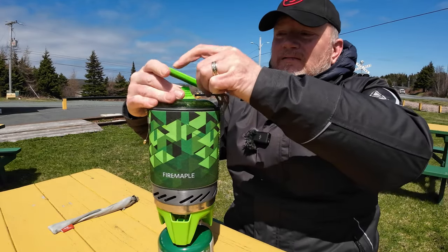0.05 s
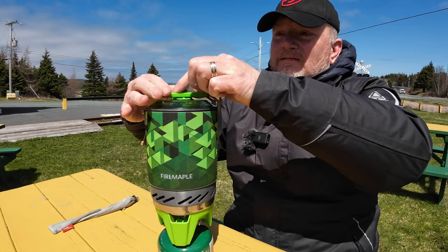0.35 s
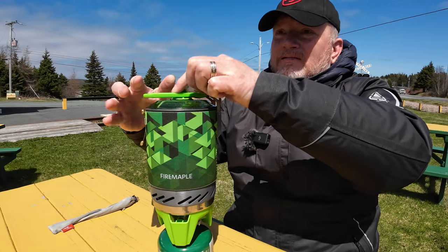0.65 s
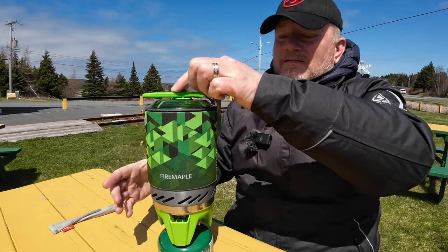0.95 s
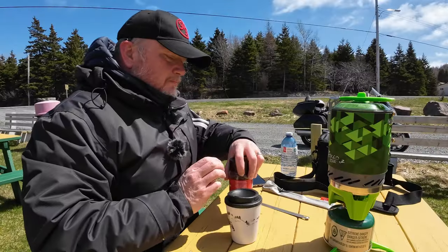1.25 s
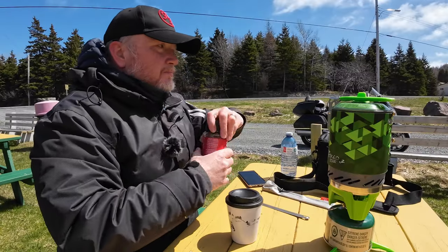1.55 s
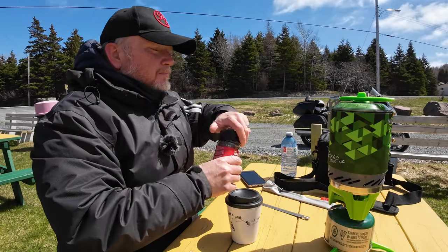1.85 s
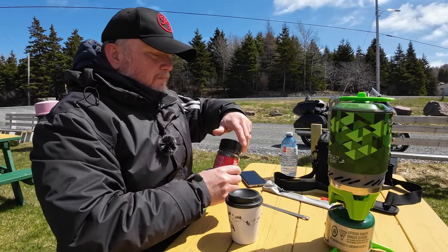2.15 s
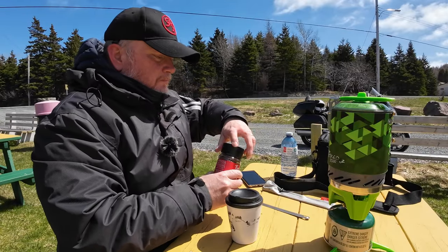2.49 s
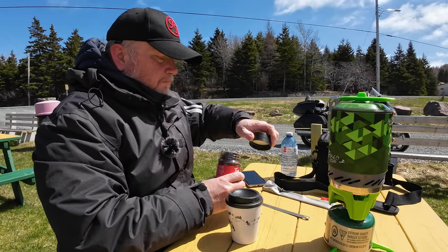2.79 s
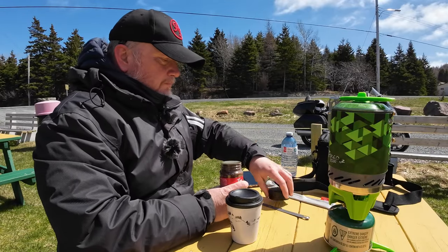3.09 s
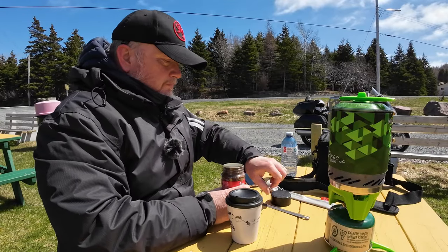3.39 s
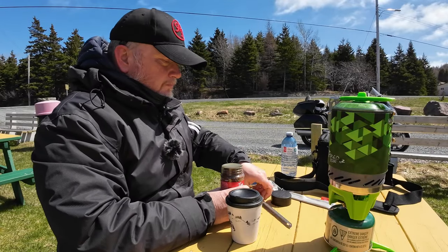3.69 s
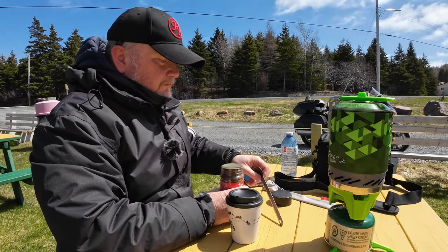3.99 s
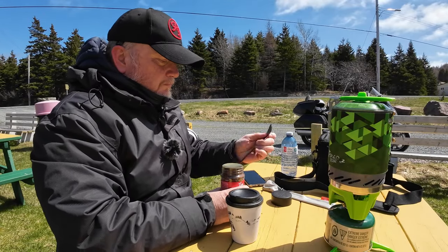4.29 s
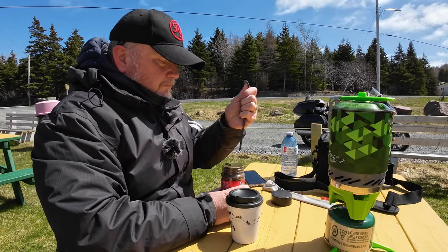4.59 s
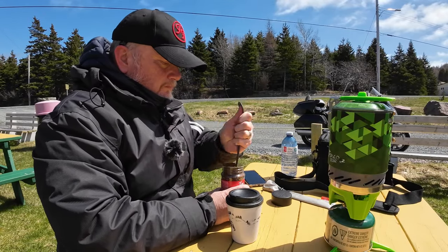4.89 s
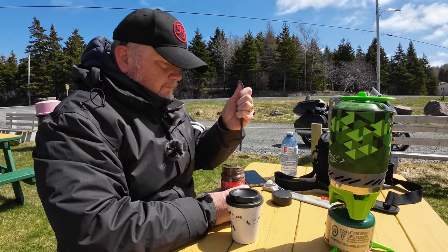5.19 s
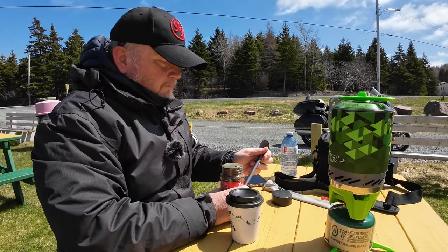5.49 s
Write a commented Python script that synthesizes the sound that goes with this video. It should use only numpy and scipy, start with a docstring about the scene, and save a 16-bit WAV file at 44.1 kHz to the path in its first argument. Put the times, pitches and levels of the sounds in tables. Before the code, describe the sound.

A gas camp stove hisses and roars under a pot throughout, outdoors, heard by one close microphone and louder on the left. At about 0.2 to 0.3 seconds the lid is pressed on with a few light ticks and knocks. Near 1.1 seconds the burner dips for an instant and continues a little softer, with a changed tone. A low, soft putter starts there and fades after 3.2 seconds. Nylon sleeves swish faintly from about 1 to 2.7 seconds. Between 1.9 and 2.7 seconds a jar is unscrewed with a short scrape, clicks and small knocks. Its cap knocks on the table at 3.3 seconds. A steel spoon is lifted with a knock and faint rattle at 3.8, followed by a light tap and tiny scrapes. Around 5 seconds it strikes the jar and crunches briefly into granules, then clinks brightly on the jar at 5.4 seconds.

```python
"""A gas camp stove hisses and roars under a pot, on a picnic table outdoors. One close microphone, louder
on the left, hears it from the front, then from the side. The flame rings the space under the pot; the
gas jet hisses above it. The lid is pressed on, a jar is unscrewed and its cap put down, and a steel
spoon is picked up, dug into granules and clinked on the jar: knocks ring each object, and friction
scrapes and squeals. Nylon sleeves swish, and a low putter comes and goes."""
import sys
import numpy as np
from scipy import signal
from scipy.fft import rfft, irfft
from scipy.io import wavfile
from scipy.ndimage import uniform_filter1d, map_coordinates

SR = 44100
rng = np.random.default_rng(int(sys.argv[2]) if len(sys.argv) > 2 else 0)


def to_wav(sig):
    """Store sig (one row per channel, or 1-D mono) as 16-bit WAV at the path in sys.argv[1].

    Samples outside -1..1 are clipped; the rate is SR.
    """
    pcm = np.clip(np.atleast_2d(sig), -1, 1) * 32767
    pcm = np.round(pcm).astype(np.int16)
    wavfile.write(sys.argv[1], SR, pcm.T)  # frames by channels


N = 249165
TIME = np.arange(N) / SR
SIDE_FROM_S = 1.092  # from here on the microphone is at the side of the stove
DIG_S, DIG_LENGTH_S = 5.009, 0.072  # the spoon goes into the granules
TOP_HZ = 15700


def undb(db):
    """Decibels to gain."""
    return 10 ** (np.asarray(db) / 20)


def unit(x):
    """Scale to rms 1."""
    return x / np.sqrt(np.mean(x ** 2))


def curve(table):
    """Join (time, value) points into a line through the scene."""
    return np.interp(TIME, *np.transpose(table))


def bell(x, centre, width):
    """Gaussian bump of height 1."""
    return np.exp(-((x - centre) / width) ** 2)


def colour(x, spectrum, peaks=()):
    """Filter by a smooth spectrum with peaks and hollows on it; rms 1."""
    f = np.fft.rfftfreq(len(x), 1 / SR)
    hz, db = np.transpose(spectrum)
    gain_db = np.interp(np.log(f + 1), np.log(hz), db)
    for centre, width, height in peaks:
        gain_db += height * bell(f, centre, width)
    return unit(irfft(rfft(x) * undb(gain_db), len(x)))


def passband(x, hz, kind="band", order=2, zero_phase=False):
    """Butterworth filter, run both ways for zero phase."""
    run = signal.sosfiltfilt if zero_phase else signal.sosfilt
    return run(signal.butter(order, hz, kind, fs=SR, output="sos"), x)


def walk(rate):
    """Random levels held 1 / rate s and smoothed twice; rms 1."""
    k = int(SR / rate)
    held = np.repeat(rng.standard_normal(N // k + 1), k)
    return unit(uniform_filter1d(uniform_filter1d(held, k), k)[:N])


def grains(count, spread_db):
    """Friction: dense tiny slips of very unequal size."""
    return rng.standard_normal(count) * undb(spread_db * rng.standard_normal(count))


def add(track, s, sound):
    """Mix a sound in at time s."""
    i = int(s * SR)
    track[i:i + len(sound)] += sound[:N - i]


def echo(x, lag_s, sway_s, share):
    """Add a reflection; a swaying path makes its comb of peaks drift. The level stays."""
    lag = (lag_s + sway_s * walk(2.436)) * SR
    reflection = map_coordinates(x, [np.arange(N) - lag], order=3)
    return x.std() * unit(x + share * reflection)


def drift(x, shift, waver_octaves):
    """Slide all resonances slowly up and down together, with a quicker waver on top."""
    speed = 2 ** (curve(shift) + waver_octaves * walk(9))
    return map_coordinates(x, [np.cumsum(speed)], order=3, mode="mirror")


def blows(hits, modes, chatter_s, damping=1):
    """Each blow rings the modes while the surfaces chatter briefly; damping divides the ring time."""
    out, t = np.zeros(N), TIME[:SR // 4]
    hz, db, t60 = np.transpose(modes)[:, :, None]
    # the body radiates little outside the range of its modes
    radiated_hz = [.8 * hz.min(), min(1.4 * hz.max(), TOP_HZ)]
    for s, level_db, tilt_db, chatter in hits:
        polarity = rng.choice([-1, 1], hz.shape)  # set by the spot that is struck
        mode_db = db + tilt_db * np.log2(hz) - 60 * damping * t / t60  # harder contact tilts upward
        ring = np.sum(polarity * undb(mode_db) * np.sin(2 * np.pi * hz * t), axis=0)
        contact = chatter * rng.standard_normal(len(t)) * np.exp(-t / chatter_s)
        blow = passband(ring / np.abs(ring).max() + contact, radiated_hz, order=3)
        add(out, s, undb(level_db) * blow / blow[t < .003].std())  # the first 3 ms set the level
    return out


def sleeves(flutter_db=2):
    """Nylon rubs on nylon; each swish is heard only from the microphone position at its middle."""
    # arm movements (middle [s], half width [s], level [dB])
    swishes = [(1.02, 0.26, -44), (1.54, 0.22, -49), (1.92, 0.11, -51.5), (2.218, .028, -49),
               (2.44, 0.06, -54), (2.71, 0.05, -55)]
    # spectrum of rubbed nylon (frequency [Hz], level [dB])
    nylon = [(30, -40), (300, 6), (1500, 13.5), (4000, -1), (8000, 0), (12000, -5), (16000, -8)]
    motion = np.zeros(N)
    for s, width, db in swishes:
        same_position = (TIME < SIDE_FROM_S) == (s < SIDE_FROM_S)
        motion += same_position * undb(db) * bell(TIME, s, width)
    return colour(grains(N, spread_db=3), nylon) * motion * undb(flutter_db * walk(59.94))


def putter_pulses(from_s=1.1375, pair_s=.0093, jitter_s=.00073, scatter_db=.8):
    """Slightly uneven pairs of impulses, about thirteen a second: the firsts and the seconds."""
    # pace of the putter (time [s], rate [pairs/s])
    pace = [(1.14, 13.65), (2.2, 13.15), (3.2, 12.9), (3.8, 12.6)]
    turns = np.cumsum(curve(pace) * (TIME >= from_s)) / SR
    starts = TIME[np.flatnonzero(np.diff(np.ceil(turns)))]
    first, second = np.zeros((2, N))
    for s, (size1, size2, late) in zip(starts[:-1], rng.standard_normal((len(starts), 3))):
        add(first, s, undb([scatter_db * size1]))
        add(second, s + pair_s + jitter_s * late, undb([scatter_db * size2]))
    return first, second


def putter(from_s=1.1375, fades_s=3.22, level_db=-31.7, fade_db_per_s=35, hum_hz=111, chirp_hz=5330):
    """Paired soft pressure dips keep a low hum going; each pair rasps, ticks and chirps faintly."""
    # spectrum of the tick (frequency [Hz], level [dB])
    tick_spectrum = [(4500, -6), (5250, -10), (5800, -6), (7900, 1), (9300, -34), (10800, -6), (15000, -41)]
    first, second = putter_pulses(from_s)
    dip = signal.windows.gaussian(SR // 20, .00089 * SR)
    dips = -signal.fftconvolve(first + second, dip, "same")
    throb = passband(dips, 46, "high", order=4, zero_phase=True)
    # hum and tick grow against the throb as it runs
    hum_db = -19.5 + 2.8 * (TIME - from_s)
    tick_db = -21.5 + 3.2 * (TIME - from_s)
    hum = undb(hum_db) * unit(signal.lfilter(*signal.iirpeak(hum_hz, Q=12, fs=SR), dips))
    overtone = undb(-23.5) * unit(signal.lfilter(*signal.iirpeak(210, Q=6, fs=SR), dips))
    rasp_gate = signal.fftconvolve(first + second, signal.windows.hann(SR // 40), "same")
    rasp = undb(-22) * rasp_gate * unit(passband(rng.standard_normal(N), [160, 270]))
    # the tick trails each dip and is stronger on the second of the pair
    tick_gate = np.roll(signal.fftconvolve(.5 * first + second, dip, "same"), int(.0035 * SR))
    ticks = tick_gate * colour(rng.standard_normal(N), tick_spectrum)
    # a thin, wavering chirp rides on the second dip
    whistle = np.sin(2 * np.pi * np.cumsum(chirp_hz + 140 * walk(90)) / SR)
    chirp_gate = signal.fftconvolve(second, signal.windows.hann(SR // 36), "same")
    chirps = whistle * chirp_gate * undb(-13 + 2.5 * walk(16))
    envelope = undb(level_db - fade_db_per_s * np.maximum(TIME - fades_s, 0))
    return envelope * (throb + hum + overtone + rasp + undb(tick_db) * (ticks + chirps))


def pot_lid():
    """The lid knocks as it is pressed on, and the rim of the pot ticks."""
    # modes of the rim and the lid (frequency [Hz], level [dB], t60 [s])
    rim = [(2850, -6.5, 0.015), (5430, 8.5, 0.029), (5900, 2, .014), (7250, -7, 0.013), (8170, 4, .014),
           (10200, -1, 0.012), (10800, -2, .012), (11700, 3, .012), (12500, 0, .012), (13500, -7, .012),
           (14600, -13, .012)]
    lid = [(219, -9, 0.057), (384, -9, 0.049), (687, 5, 0.015), (1040, 8.5, 0.0067), (1500, -7, 0.0092),
           (2250, 12, 0.0082), (5500, 1, 0.0057), (6170, 1, 0.0066)]
    # blows on each (time [s], level [dB], tilt [dB/octave], chatter [0-1])
    ticks = [(.2122, -27, -3, 0.08), (.2138, -24, -5.5, 0.12)]
    presses = [(.2, -29.5, -9.5, 0), (.3003, -24, -7, 0.1), (.304, -29.5, -8, 0.2),
               (.3085, -29.5, -1, 0.12), (.311, -29, 0, 0.15)]
    return blows(ticks, rim, chatter_s=.0019) + blows(presses, lid, chatter_s=.0055)


def jar():
    """The cap clicks as it is unscrewed, and knocks ring the body of the jar."""
    # modes of the cap and the body (frequency [Hz], level [dB], t60 [s])
    cap = [(805, 8, 0.0029), (1700, -10, 0.004), (2670, 2.5, 0.01), (2960, -2.5, 0.013), (5187, -13, 0.007),
           (6360, -11, 0.013), (7570, -7.5, 0.0074), (10900, -18.5, 0.0049)]
    body = [(1480, 5.5, 0.008), (2420, 7.5, 0.011), (2900, -5, 0.0097), (3500, -2, 0.022),
            (4900, -10, .012), (6300, -9, 0.022), (7200, 1, .016), (8070, -5, 0.024), (11390, -3, .018),
            (12350, -15, .016)]
    # blows on each (time [s], level [dB], tilt [dB/octave], chatter [0-1])
    clicks = [(1.8993, -26, -22, 0), (1.8995, -33, 22, 0), (2.443, -24.5, -1, 0.02), (2.4475, -38, 9, 0),
              (2.48, -45, 3, 0.2), (2.637, -47, 8, 0.1), (2.711, -47.5, 14, 0.4)]
    knocks = [(2.0185, -32.5, -13, .03), (2.229, -29.5, -2, .12)]
    return blows(clicks, cap, chatter_s=.0021) + blows(knocks, body, chatter_s=.0014)


def picnic_table():
    """The table top rings briefly as the cap is put down and things are handled on it."""
    # modes of the top (frequency [Hz], level [dB], t60 [s])
    top = [(850, -10, 0.016), (1040, 0, 0.014), (1680, -17, 0.011)]
    # blows on it (time [s], level [dB], tilt [dB/octave], chatter [0-1])
    knocks = [(3.2618, -24.5, 0, 0), (3.297, -35.5, 45, 0), (3.318, -34.5, 22, .1),
              (3.7935, -28.5, -21, 0.01), (5.011, -30.5, -1, 0)]
    return blows(knocks, top, chatter_s=.0026)


def spoon_lift(middle_s=3.801, count=7, gap_s=.015, jitter_s=.0017, peak_db=-44.5, fall_db_per_s=330):
    """The steel spoon leaves the table in uneven taps, loudest in the middle; a damped tap follows."""
    # modes of the spoon (frequency [Hz], level [dB], free t60 [s])
    steel = [(4116, -8, 0.066), (4350, -12, 0.071), (5286, -11, 0.073), (5750, -1, .08), (6756, -4, 0.075),
             (7510, 4, 0.093), (8200, -10, 0.086), (8769, -3, .06), (9800, -1, .04), (10800, 0, 0.072),
             (12390, -2, 0.049), (13750, -9, 0.037)]
    # the later tap (time [s], level [dB], tilt [dB/octave], chatter [0-1])
    tap = [(4.311, -37.5, 0.0042, 0.56)]
    offsets = gap_s * (np.arange(count) - (count - 1) / 2) + jitter_s * rng.standard_normal(count)
    rattle = [(middle_s + dt, peak_db - fall_db_per_s * abs(dt), 0, .076) for dt in offsets]
    return blows(rattle, steel, chatter_s=.0016) + blows(tap, steel, chatter_s=.0018, damping=4.9)


def spoon_on_jar(clink_s=5.443, clink_db=-13, bounce_s=.0068, bounce_db=-9, touch_s=.0013, touch_db=-3):
    """The spoon strikes the jar going in; later it clinks and bounces, each contact touching twice."""
    # modes of spoon and jar together (frequency [Hz], level [dB], free t60 [s])
    modes = [(2090, -1.5, 0.028), (2890, 4, 0.019), (3350, -19, 0.1), (4064, 0, 0.024), (4330, 0, .008),
             (4590, 3.5, 0.018), (4850, 1, .012), (5254, -1, 0.027), (6117, 3, .023), (6500, -1, .014),
             (6985, -3, .018), (7495, -1, .028), (7864, 1, .02), (8830, 3, 0.019), (9050, 5, 0.019),
             (9720, 5, 0.016), (10075, 5, .016), (10200, 5, 0.02), (10830, 6, 0.021), (11550, -1, .015),
             (12450, -1, .017), (14200, -2, .016), (14950, 3, 0.017)]
    # blows on the way in (time [s], level [dB], tilt [dB/octave], chatter [0-1])
    strikes = [(4.9528, -18.3, 0, .4), (4.9583, -26.5, 4, .3), (4.9653, -27.5, 6, .35), (4.972, -33, 0, .3)]
    contacts = [(clink_s, clink_db), (clink_s + bounce_s, clink_db + bounce_db)]
    clink = [(s + k * touch_s, db + k * touch_db, -1, .13) for s, db in contacts for k in range(2)]
    going_in = blows(strikes, modes, chatter_s=.0025, damping=2.4)
    return going_in + blows(clink, modes, chatter_s=.0021, damping=1.1)


def scrape(length_s, start_db, end_db, peaks):
    """One stroke of uneven slips through the given resonances."""
    # spectrum of gritty friction (frequency [Hz], level [dB])
    grit = [(30, -45), (75, -11), (160, 12.5), (700, 5), (1300, 8.5), (2200, 1), (3500, 5), (4300, -14),
            (5600, -2), (9000, 0.5), (11500, -12), (15500, -11)]
    slips = colour(grains(SR // 8, spread_db=4), grit, peaks)[:int(length_s * SR)]
    contact = signal.windows.tukey(len(slips), .2)
    return slips * contact * undb(np.linspace(start_db, end_db, len(slips)))


def friction(width_ratio=.27, overtone_ratio=1.75, judder_db=1.3):
    """The cap turns on its thread and the spoon slides over the rim into the granules, juddering."""
    # strokes (time [s], length [s], start level [dB], fade [dB], squeal [Hz], squeal height [dB])
    slides = [(1.89, 0.1, -45.5, 10, 8100, 18), (4.426, 0.064, -53, 10, 9300, 16),
              (4.57, 0.053, -54.5, 1, 9330, 17), (4.9512, 0.00425, -25.5, -14, 7350, 19),
              (4.954, 0.049, -25, 19, 7560, 15.5)]
    # resonances while digging (frequency [Hz], width [Hz], height [dB])
    granules = [(850, 650, 5.5), (2800, 500, 2), (5400, 414, 2)]
    out = np.zeros(N)
    for s, length, db, fade_db, hz, squeal_db in slides:
        squeal = [(ratio * hz, width_ratio * hz, squeal_db) for ratio in (1, overtone_ratio)]
        add(out, s, scrape(length, db, db - fade_db, squeal))
    add(out, DIG_S, scrape(DIG_LENGTH_S, start_db=-36.5, end_db=-34.5, peaks=granules))
    return out * undb(judder_db * walk(300))


def crunch(count=9, start_db=-45, rise_db=7, scatter_db=4, jitter_s=.0018):
    """Granules snap against the jar wall at uneven moments, harder as the spoon goes in."""
    # modes of the wall (frequency [Hz], level [dB], t60 [s])
    wall = [(2680, -3, .014), (3490, 0, .022), (5330, 0, .02), (7100, -1, .012), (7950, 0, .012)]
    depth = np.arange(1, count + 1) / (count + 1)
    late, size = rng.standard_normal((count, 2)).T
    times = DIG_S + DIG_LENGTH_S * depth + jitter_s * late
    levels = start_db + rise_db * depth + scatter_db * size
    snaps = [(s, db, 0, .38) for s, db in zip(times, levels)]
    return blows(snaps, wall, chatter_s=.001)


def flame(gas, jet, ring_hz=(1070, 1340), boom_hz=(290, 360), flutter_db=.95):
    """The turbulent flame, the gas noise below the jet's hiss, rings the cup under the pot."""
    # strength of the cup's ring and of its low boom (time [s], gain [dB])
    ring_db = [(1.15, 3), (1.85, -7.5), (2.3, -3), (4.7, -0.5), (5.05, 4.5), (5.65, 3.6)]
    boom_db = [(1, 3.5), (1.2, -3), (2, -1.5), (2.5, 0)]
    # drift of the roar's resonances (time [s], shift [octaves])
    shift = [(.2, 0.00069), (1, 0), (1.249, -0.048), (1.9, -0.04), (2.802, -.015), (3.501, 0.01), (4.4, 0),
             (5.1, -0.0054), (5.65, 0.0093)]
    # brief swells and sags of the roar (time [s], half width [s], change [dB])
    surges = [(0.43, 0.0074, -11.5), (.8, 0.032, 2.5), (1.27, 0.19, 0.85), (2.57, 0.067, -2.5),
              (3.15, 0.054, 1.2), (3.57, 0.13, -3)]
    ring = (undb(curve(ring_db)) - 1) * passband(gas, ring_hz, zero_phase=True)
    boom = (undb(curve(boom_db)) - 1) * passband(gas, boom_hz, zero_phase=True)
    roar = drift(gas - jet + ring + boom, shift, waver_octaves=.004)
    roar = echo(roar, lag_s=.0042, sway_s=.0002, share=.14)
    surge_db = sum(db * bell(TIME, s, width) for s, width, db in surges)
    return roar * undb(surge_db + flutter_db * walk(35))


def burner(spectrum, cup, hiss_shift, roar_db, hiss_db, jacket_s, jacket_share, split_hz=3800):
    """The flame roars; above it the gas jet hisses and glances off the chest of the jacket."""
    gas = colour(rng.standard_normal(N), spectrum, cup)
    jet = passband(gas, split_hz, "high", order=4, zero_phase=True)
    roar = undb(roar_db) * flame(gas, jet)
    hiss = echo(jet, lag_s=jacket_s, sway_s=0, share=jacket_share)
    hiss = drift(hiss, hiss_shift, waver_octaves=.018)
    hiss = echo(hiss, lag_s=.0009, sway_s=.00007, share=.17)
    return roar + hiss * undb(hiss_db + .7 * walk(10) + .3 * walk(3))  # flutter and slow swell


def stove(gap_s=.0099):
    """The burner close up, louder from the front; the level dips briefly as the side takes over."""
    # spectrum of roar and hiss at each microphone position (frequency [Hz], level [dB])
    front_spectrum = [(30, -26.5), (85, -7.5), (170, -3.5), (320, 0.5), (520, -6), (1000, -6), (1600, -4.5),
                      (2200, -12), (2900, -13), (3600, -26.5), (4500, -36), (6200, -22.5), (7600, -30),
                      (10000, -29.5), (15500, -37)]
    side_spectrum = [(30, -37), (80, -9.5), (160, -3), (280, -3), (500, -6), (750, -2), (1650, 0),
                     (2400, -11), (3500, -24), (4600, -36.5), (6700, -21), (8800, -35.5), (10500, -38),
                     (15500, -38)]
    # peaks and hollows of burner cup and pot (frequency [Hz], width [Hz], height [dB])
    front_cup = [(887, 153, 5.5), (1058, 49, 5.5), (1905, 73, -9), (2870, 170, 7), (4940, 710, 2),
                 (5960, 320, 7), (6860, 450, 4.5), (8750, 450, 9.5)]
    side_cup = [(338, 37, 9), (498, 47, -4), (984, 65, -12.5), (1167, 78, 2), (1412, 91, -11),
                (2080, 110, -0.5), (2260, 68, 2), (2620, 99, -2.5), (2980, 130, 8), (8920, 970, 7.5),
                (11630, 700, 5.5)]
    # drift of the hiss's resonances (time [s], shift [octaves])
    front_shift = [(.05, .01), (.3, .035), (.55, -.005), (.8, -.035), (.95, .02), (1.08, .045)]
    side_shift = [(1.05, 0.033), (1.4, .015), (1.8, -0.027), (2.301, 0.0077), (2.9, 0.0046),
                  (3.399, -0.017), (3.801, 0.032), (4.25, 0.052), (4.6, 0.014), (5, 0.045), (5.3, 0.007),
                  (5.65, 0.035)]
    front = burner(front_spectrum, front_cup, front_shift,
                   roar_db=-34.5, hiss_db=-36.5, jacket_s=.00133, jacket_share=.17)
    side = burner(side_spectrum, side_cup, side_shift,
                  roar_db=-39.5, hiss_db=-38, jacket_s=.00162, jacket_share=.22)
    dip = 1 - bell(TIME, SIDE_FROM_S, gap_s)
    return dip * np.where(TIME < SIDE_FROM_S, front, side)


def scene(left_db=6):
    """Handling, stove, putter and sleeves at one close microphone, louder on the left."""
    handling = pot_lid() + jar() + picnic_table() + spoon_lift() + spoon_on_jar() + friction() + crunch()
    pan = undb([[left_db], [0]])
    return pan / pan.mean() * (handling + stove() + putter() + sleeves())


def record(dry):
    """The recorder cuts the top treble steeply."""
    return signal.sosfilt(signal.ellip(10, .1, 80, TOP_HZ, fs=SR, output="sos"), dry)


dry = scene()
out = record(dry)
to_wav(out)
```